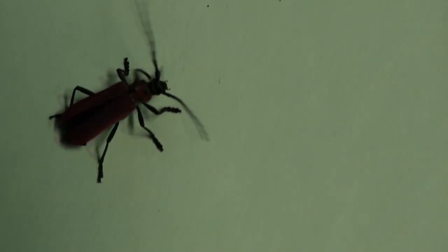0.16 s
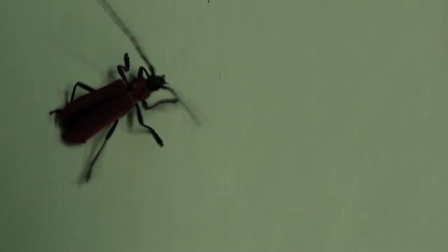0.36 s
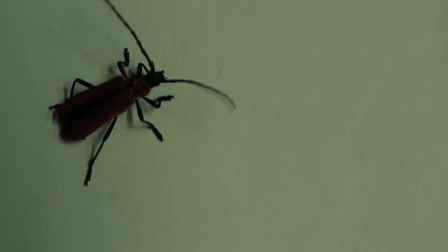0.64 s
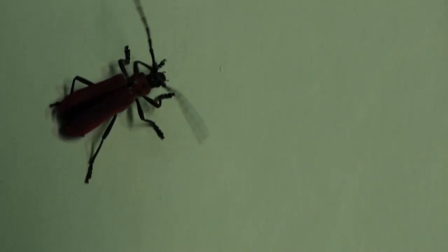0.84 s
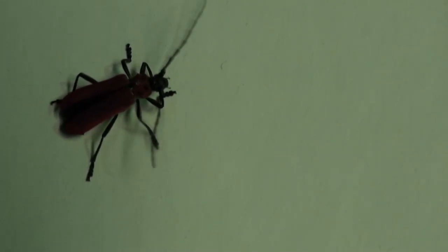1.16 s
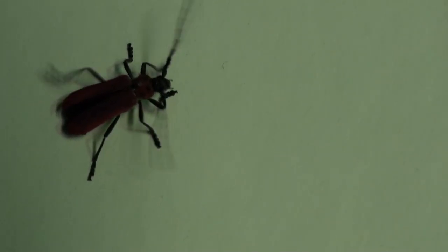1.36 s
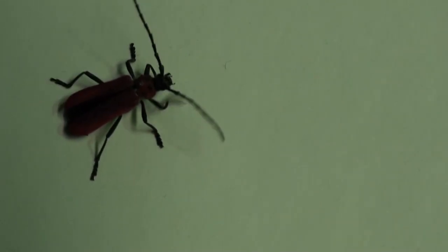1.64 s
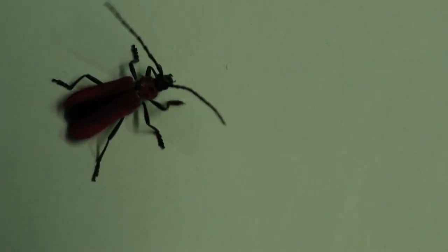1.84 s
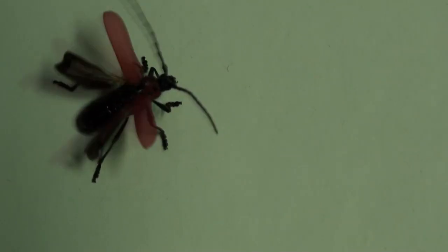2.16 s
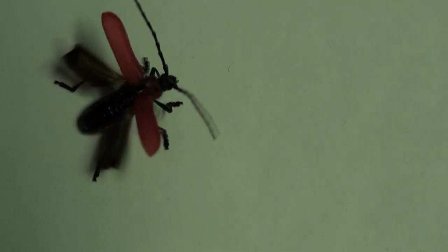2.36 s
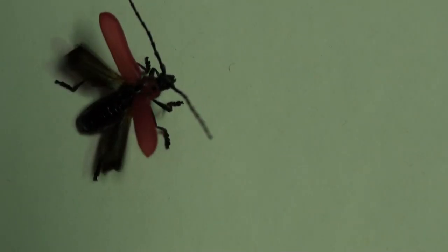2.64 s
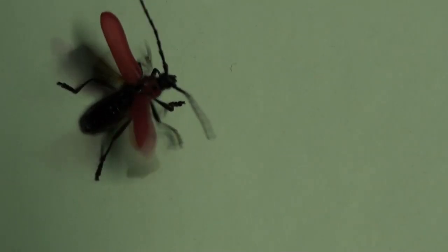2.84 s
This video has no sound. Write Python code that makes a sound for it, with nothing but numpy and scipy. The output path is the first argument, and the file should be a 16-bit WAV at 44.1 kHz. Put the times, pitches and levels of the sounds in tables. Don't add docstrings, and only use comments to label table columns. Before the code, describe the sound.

Beetle wing claps, crisp and slowed into rapid stutters, burst over a low ventilation drone

```python
import sys
import numpy as np
from scipy import signal
from scipy.fft import rfft, irfft
from scipy.io import wavfile
from scipy.ndimage import uniform_filter1d

SR = 44100
rng = np.random.default_rng(int(sys.argv[2]) if len(sys.argv) > 2 else 0)


def how_loud(loudness_db):
    steps = np.asarray(loudness_db, float) / 20
    return 10 ** steps


def generate_wav(signal):
    frames = np.transpose(np.atleast_2d(signal))
    scaled = np.clip(frames, -1, 1) * 32767
    pcm = np.round(scaled).astype(np.int16)
    wavfile.write(sys.argv[1], SR, pcm)


N = 132300
T = np.arange(N) / SR
HZ = np.maximum(np.fft.rfftfreq(N, 1 / SR), 1)

SLOW_FROM_S, PIECE_S = .1772, .075
BACK_MS = [44.67, 67.85, 44.76, 61.59, 59.32, 59.34, 45.94, 54.38, 66.87, 57.78, 52.43, 53.02, 63.33, 44.29,
           53.4, 71.09, 56.26, 47.85, 58.1, 50.32, 68.46, 52.72, 58.96, 57.37, 49.95, 50.09, 68.71, 56.26,
           52.72, 59.8, 55.37, 48.25, 62.63, 58.55, 54.78, 47.55, 61.63]
WINGS_OPEN_S = 2.7162
BEETLE_PAN_DB, BEETLE_ALIKE = -1, .84


def at_hz(points):
    hz, db = np.transpose(points)
    return how_loud(np.interp(np.log(HZ), np.log(hz), db))


def coloured(x, gain):
    return irfft(rfft(x) * gain, N)


def band(x, edges_hz):
    return signal.sosfilt(signal.butter(3, edges_hz, "band", fs=SR, output="sos"), x)


def live(s):
    piece = max(int((s - SLOW_FROM_S) / PIECE_S), 0)
    return s - sum(BACK_MS[:piece]) / 1000


def live_mean(s):
    back_s = np.cumsum([0] + list(BACK_MS)) / 1000
    middle_s = SLOW_FROM_S + PIECE_S * (np.arange(len(back_s)) + .5)
    return s - np.interp(s, middle_s, back_s)


def age(s):
    return np.maximum(T - live(s), 0)


def burst(s, db, t60):
    t = age(s)
    return how_loud(db - 60 * t / t60) * (1 - np.exp(-t / .0004))


def both_ports(envelope, colour):
    mid, side = rng.standard_normal((2, N))
    noise = np.sqrt(BEETLE_ALIKE) * mid + np.sqrt(1 - BEETLE_ALIKE) * side * [[1], [-1]]
    return colour(envelope * noise)


def drone(noise):
    # (centre [Hz], width [Hz], level [dB])
    resonances = [(57.9, 14, -46), (82.65, 18, -47), (154, 18, -50), (194.5, 22, -51.5), (245.6, 40, -60),
                  (352, 52, -54.5), (996, 270, -65)]
    # (time [s], level [dB])
    rumble_swell = [(0.0, -51.5), (0.05, -44.5), (0.2, -62), (0.22, -50), (0.27, -47), (1.24, -51.5),
                    (1.28, -46.5), (1.73, -46), (1.75, -49), (1.78, -44), (1.91, -56), (2.5, -52.5),
                    (2.74, -58), (3.0, -46)]
    s, rumble_db = np.transpose(rumble_swell)
    swell = how_loud(np.interp(T, live_mean(s), rumble_db - rumble_db.mean()))
    out = np.zeros(N)
    for hz, width, db in resonances:
        tone = irfft(noise * how_loud(db) / (1 + (2 * (HZ - hz) / width) ** 2), N)
        if width < 30:
            size = np.abs(signal.hilbert(tone)) / tone.std() + .1
            tone = tone / size ** .9
        out += tone * swell if hz < 100 else tone
    return out


def hum():
    # (time [s], pitch [Hz], level [dB])
    hum_path = [(0.0, 237, -34.5), (0.03, 239.7, -57), (0.32, 246, -41), (0.51, 245.7, -39),
                (0.57, 251, -50), (0.71, 240.7, -53), (0.83, 241.3, -45), (1.18, 249.2, -43),
                (1.38, 240.5, -48), (1.54, 249.4, -47), (1.58, 241.5, -41.5), (1.85, 247, -50.5),
                (1.88, 240.4, -46), (2.5, 250.1, -49.5), (2.75, 238.2, -59), (2.84, 236.4, -52),
                (2.9, 252.3, -50), (3.0, 236, -43.5)]
    s, hz, db = np.transpose(hum_path)
    pitch = np.interp(T, live_mean(s), hz)
    level = how_loud(1 + np.interp(T, live_mean(s), db))
    return level * np.sqrt(2) * np.sin(2 * np.pi * np.cumsum(pitch) / SR)


def room():
    # (frequency [Hz], level [dB per Hz])
    right_air = [(25, -54.5), (110, -61), (380, -55), (520, -69.5), (1150, -67.5), (4000, -78),
                 (9500, -91.5), (15500, -90.5)]
    # (frequency [Hz], level [dB per Hz])
    left_air = [(60, -132), (200, -82), (600, -69.5), (1300, -74), (4000, -83), (10500, -94), (15500, -111)]
    # (frequency [Hz], gain [dB])
    left_share = [(60, -21), (250, -17.5), (500, -25.5), (1500, -18.5), (15000, -18)]
    right_noise, drone_noise, left_noise = rfft(rng.standard_normal((3, N))) * how_loud(33)
    whine = how_loud(-74) * np.sin(2 * np.pi * 10435 * T)
    right = irfft(right_noise * at_hz(right_air), N) + whine + hum() + drone(drone_noise)
    left = coloured(right, at_hz(left_share)) + irfft(left_noise * at_hz(left_air), N)
    return np.array([left, right])


def feet():
    # (time [s], peak level [dB])
    foot_ticks = [
        (0.4352, -37.5),
        (1.492, -44),
        (2.59, -54),
    ]
    tick_hz, lag_s, t60 = (4800, 11700), .001, .012
    ticks = sum(burst(s + lag_s, db + 4, t60) for s, db in foot_ticks)
    return both_ports(ticks, lambda x: band(band(x, tick_hz), tick_hz))


def wing_cases():
    # (time [s], half length [s], level [dB], low edge [Hz], high edge [Hz])
    case_rustles = [
        (1.1200, .004, -60, 10000, 11800),
        (1.8710, .009, -56, 9300, 12800),
        (1.885, .009, -59.5, 10500, 14000),
        (1.876, .016, -63, 6500, 10000),
        (2.7030, .008, -63, 8000, 13500),
        (2.7250, .0035, -49, 5500, 13000),
        (2.7906, .0011, -37, 9300, 14500),
        (2.8708, .0011, -40, 7600, 9400),
    ]
    out = np.zeros((2, N))
    for s, half, db, low_hz, high_hz in case_rustles:
        soft = how_loud(db + 6) * np.exp(-((T - live(s)) / half) ** 2)
        out += both_ports(soft, lambda x: band(x, (low_hz, high_hz)))
    return out


def whirr(snap_colour):
    start_db, rise_db_per_s, grain_db, grain_s = -48.5, 50, 4, .0012
    t = age(WINGS_OPEN_S)
    rising = (t > 0) * how_loud(start_db + rise_db_per_s * np.minimum(t, .1))
    grain = grain_db * np.interp(T / grain_s, np.arange(4000), rng.standard_normal(4000))
    return both_ports(rising * how_loud(grain + 2), lambda x: coloured(x, snap_colour))


def pop():
    from_hz, to_hz, fall_s = 4800, 1300, .005
    t = age(WINGS_OPEN_S)
    pitch = from_hz * (to_hz / from_hz) ** np.minimum(t / fall_s, 1)
    fading = np.sin(np.pi * np.minimum(t / (0.86 * fall_s), 1)) ** .5
    return how_loud(-41) * fading * np.sin(2 * np.pi * np.cumsum(pitch) / SR)


def tips():
    # (time [s], peak level [dB])
    tip_spikes = [
        (2.7966, -33),
        (2.8615, -26),
        (2.9246, -32),
        (2.9388, -30),
    ]
    spikes = np.zeros(N)
    for s, db in tip_spikes:
        spikes[int(live(s) * SR)] = -2 * how_loud(db)
    return band(spikes + 1e-18, (2500, 15000))


def claps(snap_colour):
    # (time [s], snap level [dB], body ring level [dB], snap T60 [s], brightest frequency [Hz])
    wing_claps = [
        (2.7162, -40.5, -47, 0.021, 11300),
        (2.796, -34.5, -52, 0.022, 7900),
        (2.862, -35, -44, 0.024, 11000),
        (2.8660, -47, -43, .012, 12000),
        (2.925, -31, -34, 0.018, 11500),
        (2.9355, -47, -53, .01, 12500),
        (2.9387, -31.5, -48, 0.02, 9000),
        (2.9950, -45, -52, 0.012, 12400),
    ]
    # (frequency [Hz], level [dB], T60 [s])
    body_rings = [(2570, -4, .026), (2700, -10, .014), (3940, 0, .018), (5400, -6, .012), (1750, -8, .02)]
    focus_db, focus_octaves, push_hz = 11, .3, 404
    out = np.zeros((2, N))
    strength_db = rng.normal(0, 1, (len(wing_claps), len(body_rings)))
    for (s, snap_db, ring_db, t60, focus_hz), extra in zip(wing_claps, strength_db):
        off_focus = np.log2(HZ / focus_hz) / focus_octaves
        colour = snap_colour * how_loud(focus_db * np.exp(-off_focus ** 2))
        snap_and_crack = burst(s, snap_db, t60) + burst(s, snap_db + 7.5, .0043)
        out += both_ports(snap_and_crack, lambda x: coloured(x, colour))
        t = age(s)
        for (hz, db, ring_s), own_db in zip(body_rings, extra):
            out += burst(s, ring_db + db + own_db, ring_s) * np.sin(2 * np.pi * hz * t)
        out -= how_loud(ring_db - 4) * np.sin(2 * np.pi * push_hz * t) * np.exp(-push_hz * 2 * t)
    return out


def wings():
    # (frequency [Hz], gain [dB])
    snap_points = [(1500, -1.5), (3200, 0), (4500, 0), (6500, -3.5), (8500, -2), (11000, -3.5), (13500, -5),
                   (15500, -7)]
    snap_colour = at_hz(snap_points)
    return whirr(snap_colour) + claps(snap_colour) + pop() + tips()


def slowed(x, seek_s):
    fade_s, cut_s = .015, .004
    piece, fade = PIECE_S * SR, int(fade_s * SR)
    first, seek = int(SLOW_FROM_S * SR), int(seek_s * SR)
    at_full_speed = x * np.clip((SLOW_FROM_S - T) / cut_s, 0, 1)
    out = np.pad(at_full_speed, ((0, 0), (0, SR)))
    ramp, tail = np.arange(fade) / fade, None
    for k, back_ms in enumerate(np.cumsum([0] + list(BACK_MS))):
        at = first + int(k * piece)
        size = int((k + 1) * piece) - int(k * piece)
        start = at - int(round(back_ms * SR / 1000))
        if k and seek:
            nearby = x[1, start - seek:start + seek + fade]
            start += np.argmax(np.correlate(nearby, tail, "valid")) - seek
        window = np.concatenate([ramp, np.ones(size - fade), 1 - ramp])
        out[:, at:at + size + fade] += window * x[:, start:start + size + fade]
        tail = x[1, start + size:start + size + fade]
    return out[:, :N]


def scene():
    air = room()
    pan = how_loud([[BEETLE_PAN_DB / 2], [-BEETLE_PAN_DB / 2]])
    beetle = (feet() + wing_cases() + wings()) * pan
    return slowed(air, .0025) + slowed(beetle, 0)


def roll_off(x):
    return signal.sosfilt(signal.butter(12, 16080, fs=SR, output="sos"), x)


def record(dry):
    gate_ease = [0, -1, 0, -2, -3, 5]
    left_edge_hz, top_hz, gate_db, patch_db, patch_s = 11400, 15800, -62, 1, .03
    spectrum = rfft(dry) * (HZ < top_hz)
    left = irfft(spectrum[0] * (HZ < left_edge_hz), N)
    edges = np.linspace(left_edge_hz, top_hz, num=7)
    patches = rng.standard_normal((6, 120))
    for low, high, ease_db, patch in zip(edges, edges[1:], gate_ease, patches):
        part = irfft(spectrum[0] * ((HZ >= low) & (HZ < high)), N)
        level_db = 10 * np.log10(uniform_filter1d(part ** 2, size=1024) + 1e-14)
        chance_db = patch_db * np.interp(T / patch_s, np.arange(120), patch)
        gate = np.clip((level_db + ease_db + chance_db - gate_db) / 2, 0, 1)
        left += how_loud(-9) * gate * part
    return roll_off(np.array([left, irfft(spectrum[1], N)]))


dry = scene()
out = record(dry)
generate_wav(out)
```